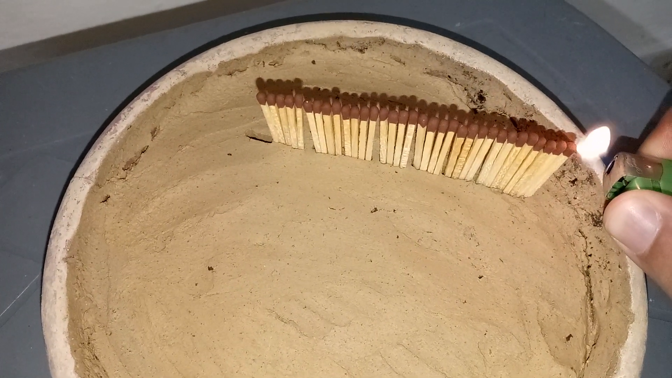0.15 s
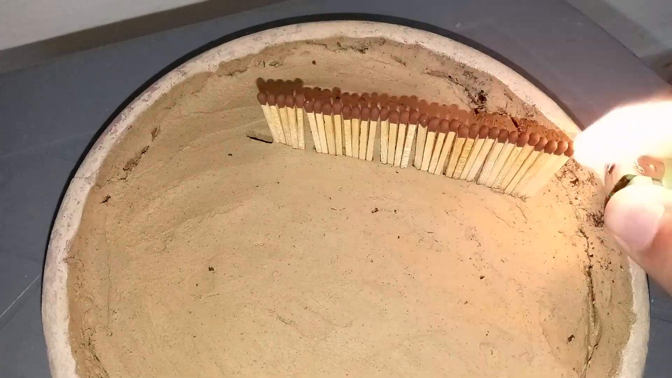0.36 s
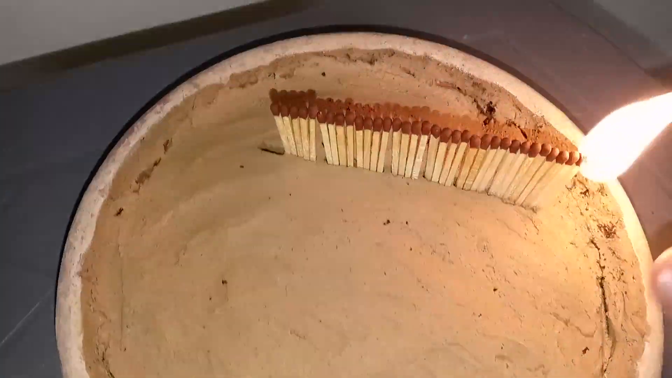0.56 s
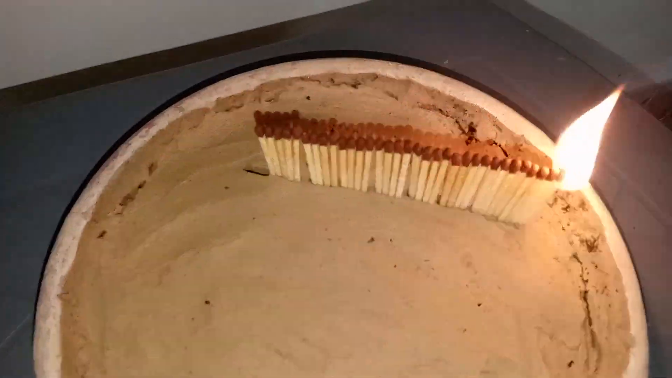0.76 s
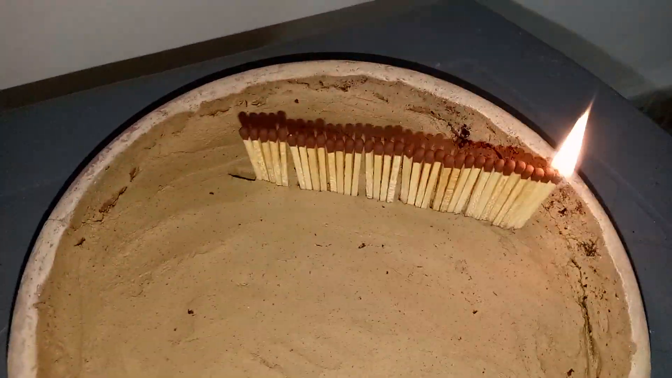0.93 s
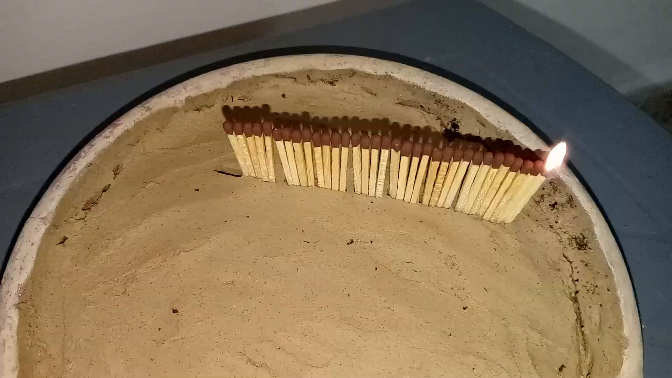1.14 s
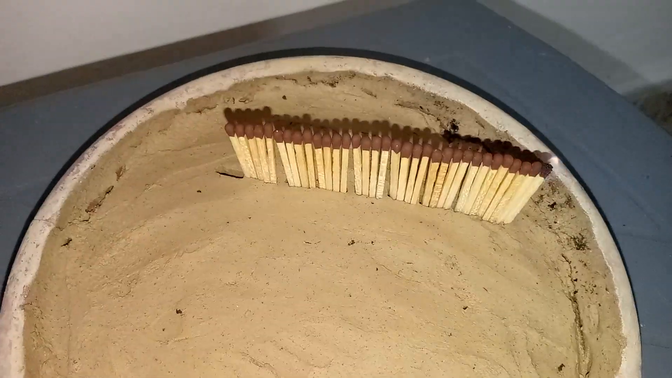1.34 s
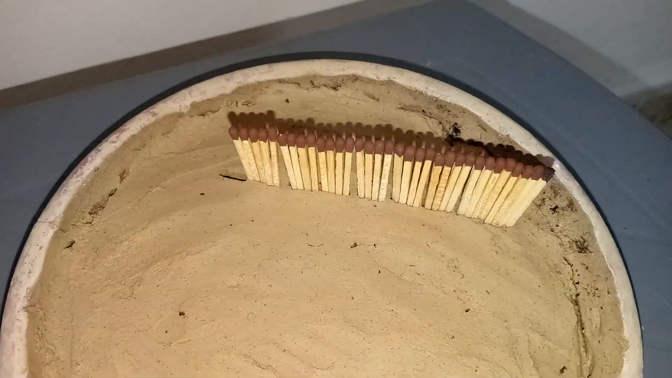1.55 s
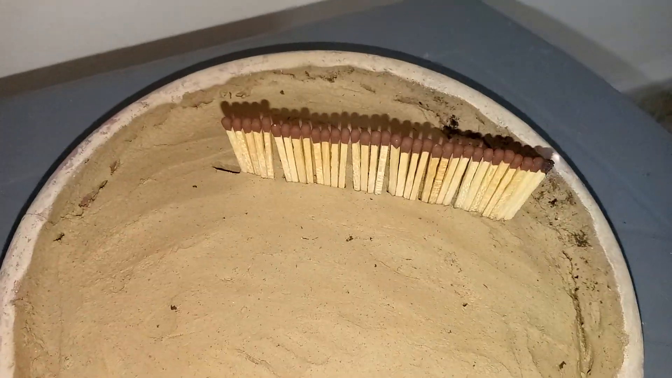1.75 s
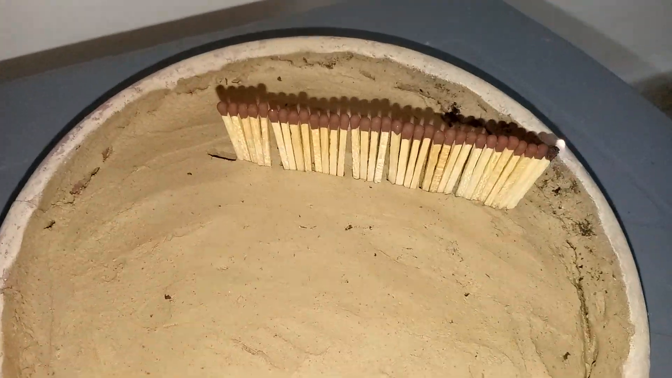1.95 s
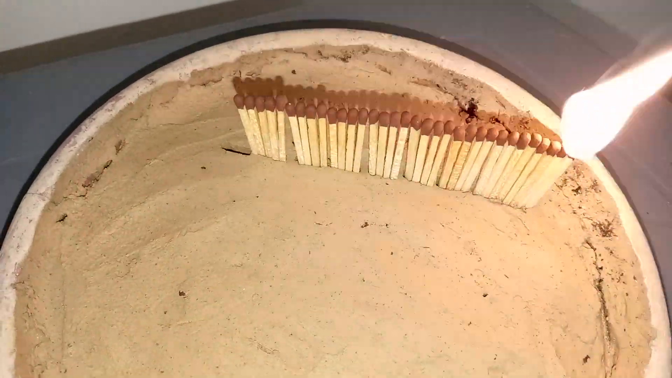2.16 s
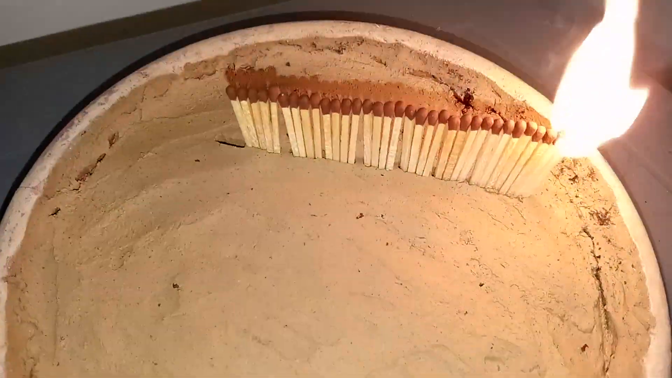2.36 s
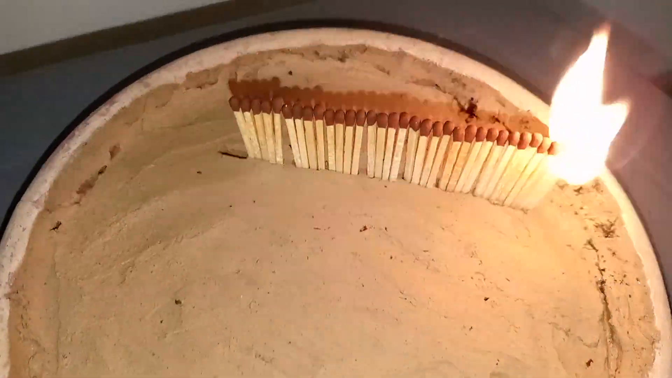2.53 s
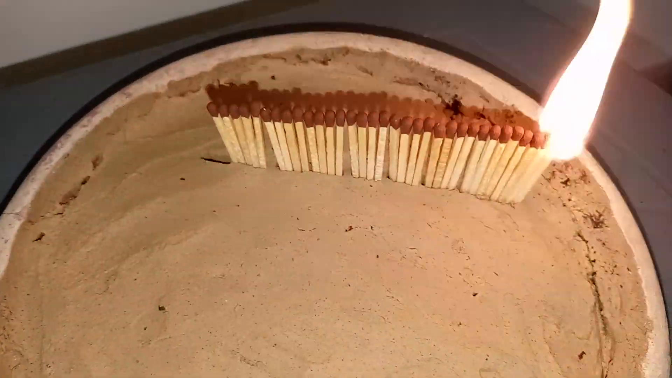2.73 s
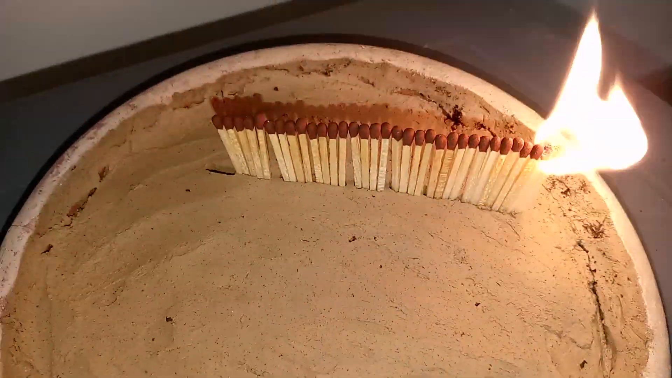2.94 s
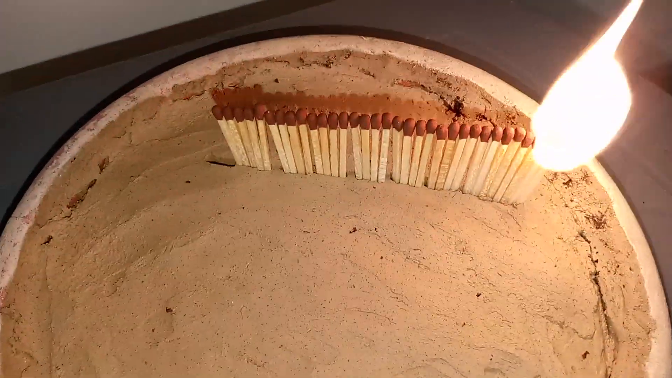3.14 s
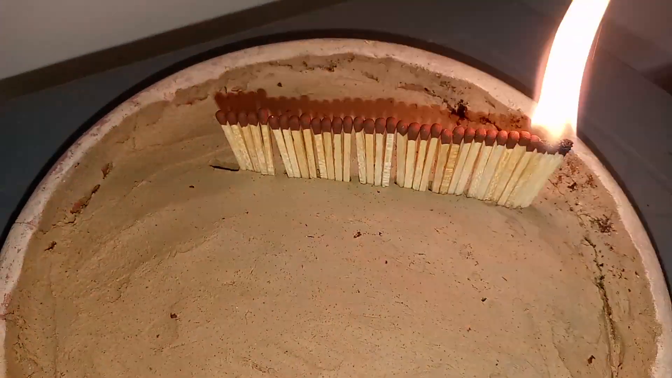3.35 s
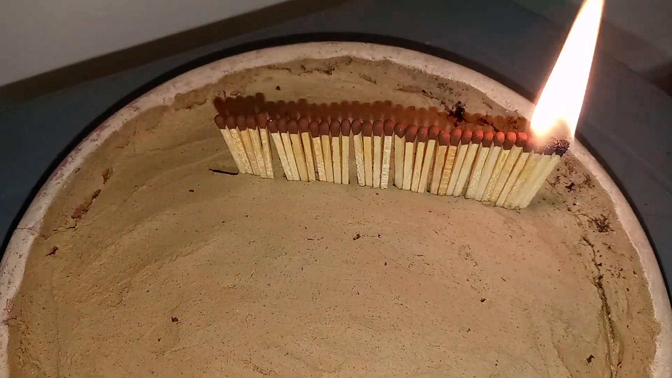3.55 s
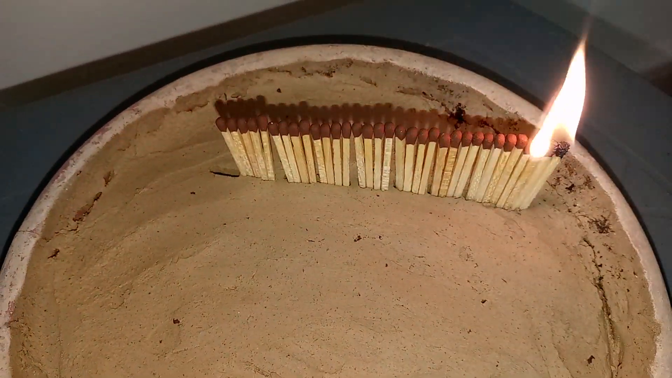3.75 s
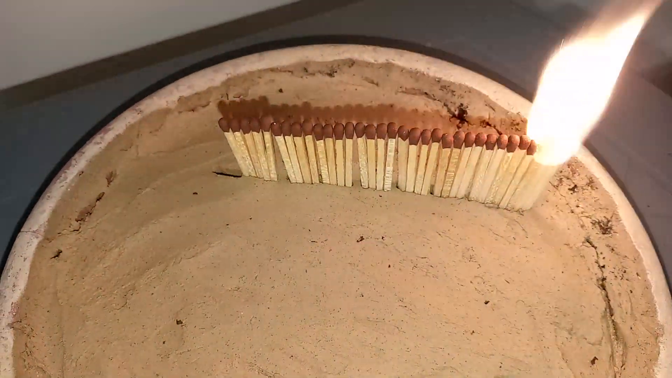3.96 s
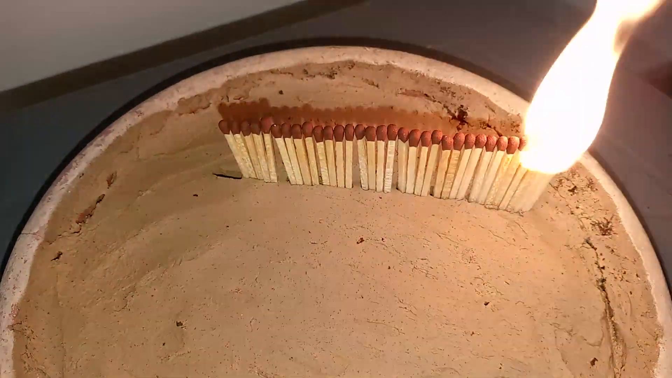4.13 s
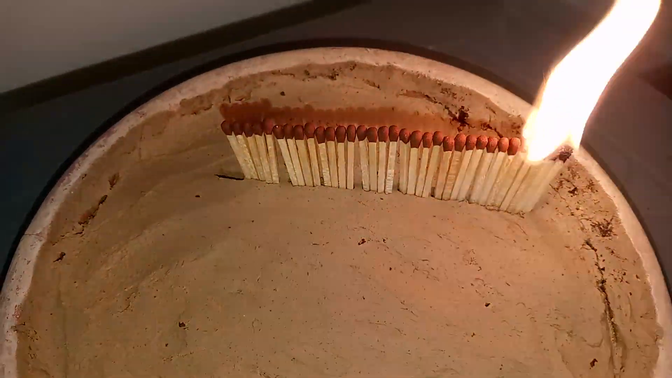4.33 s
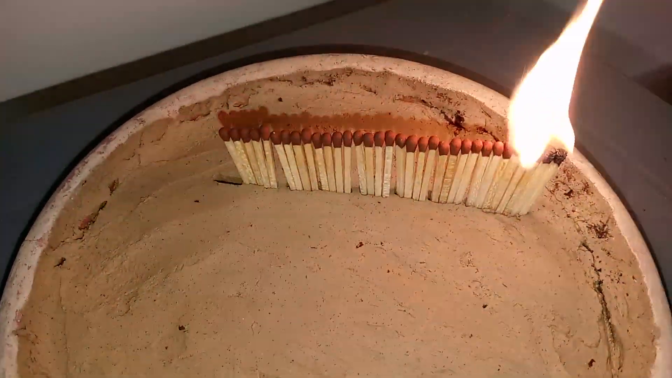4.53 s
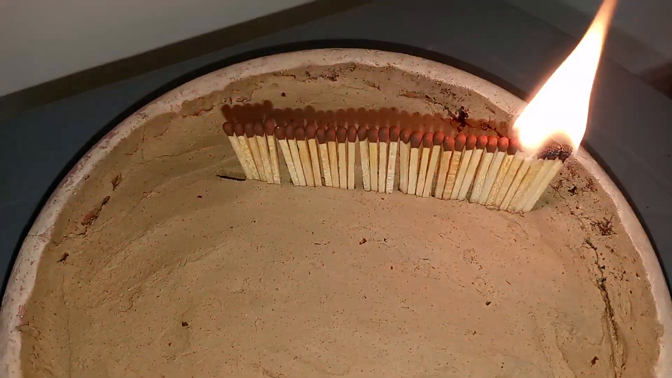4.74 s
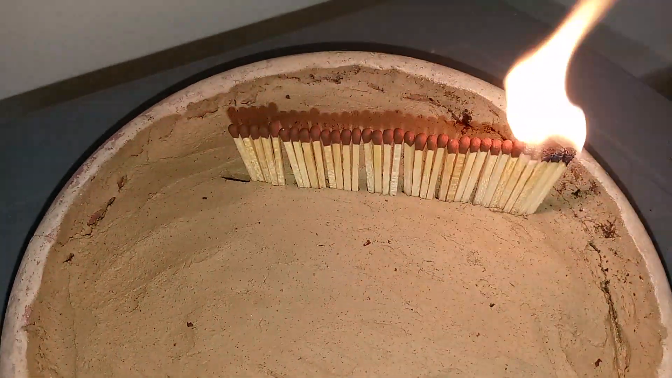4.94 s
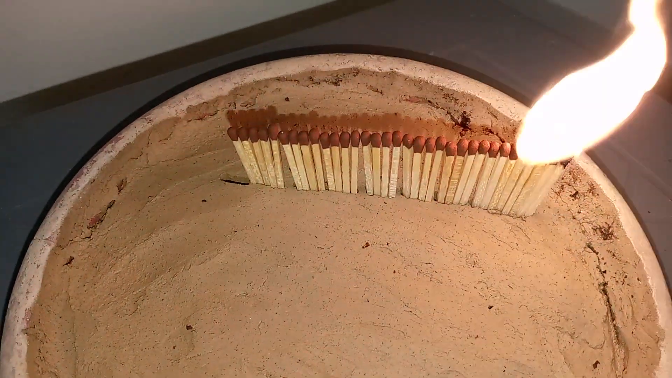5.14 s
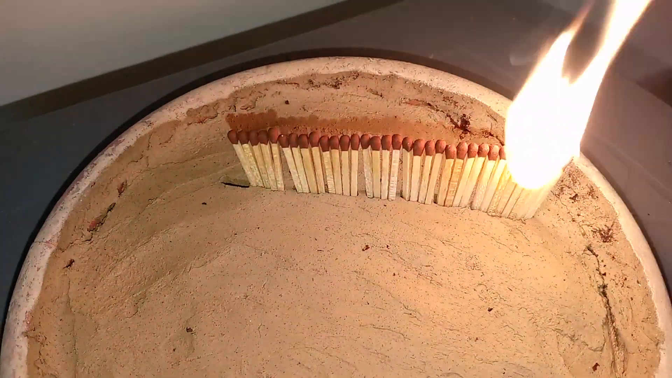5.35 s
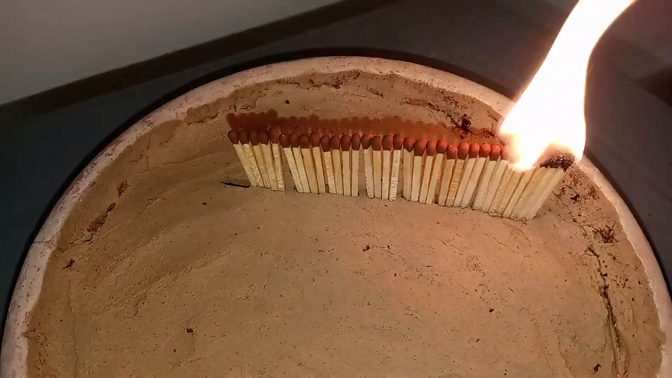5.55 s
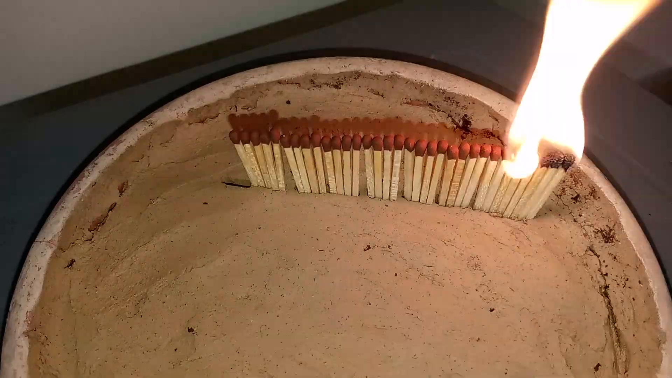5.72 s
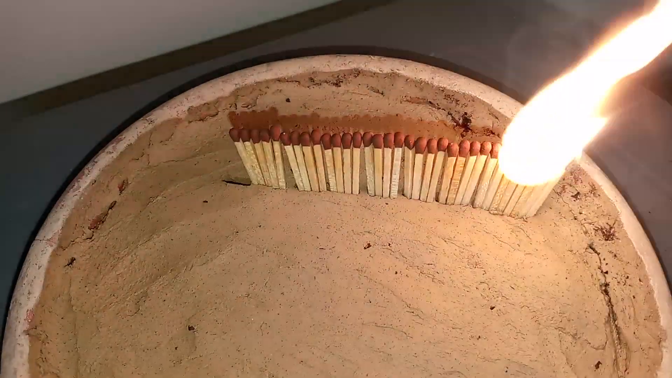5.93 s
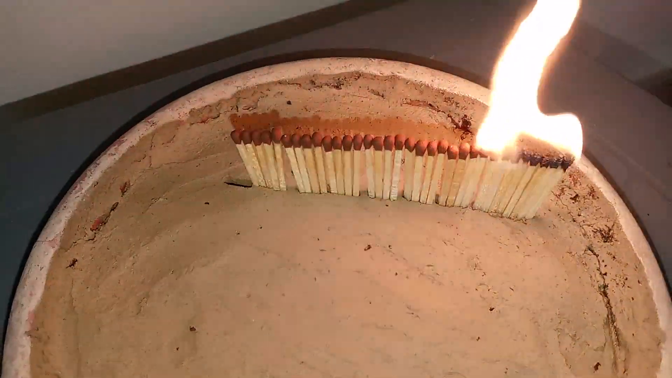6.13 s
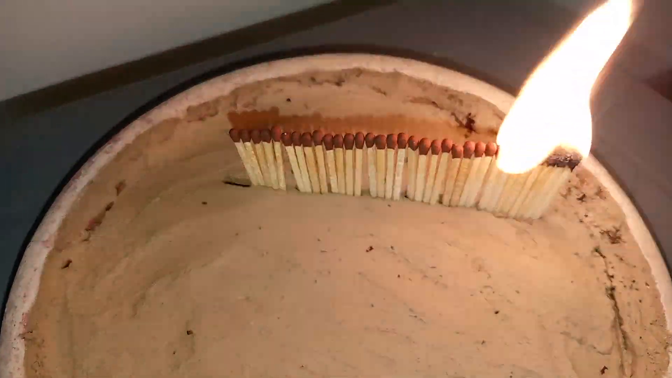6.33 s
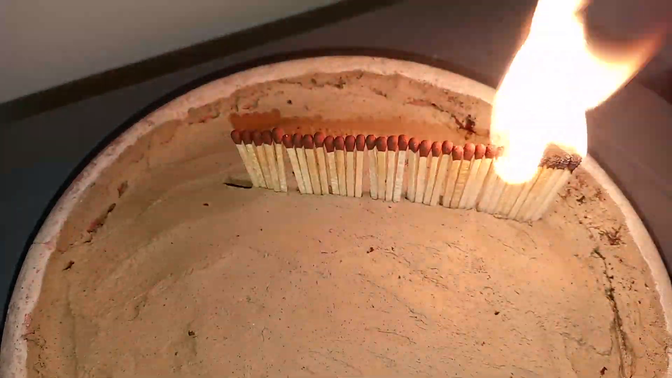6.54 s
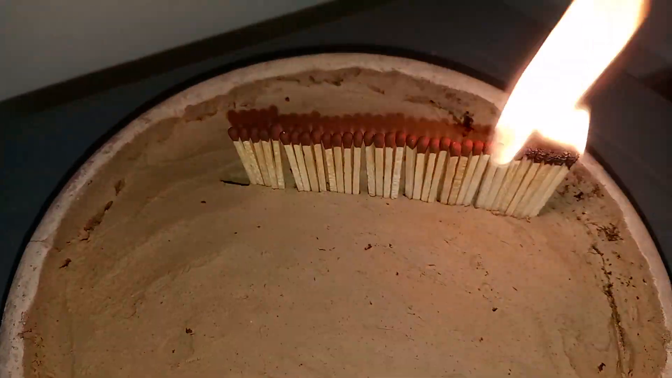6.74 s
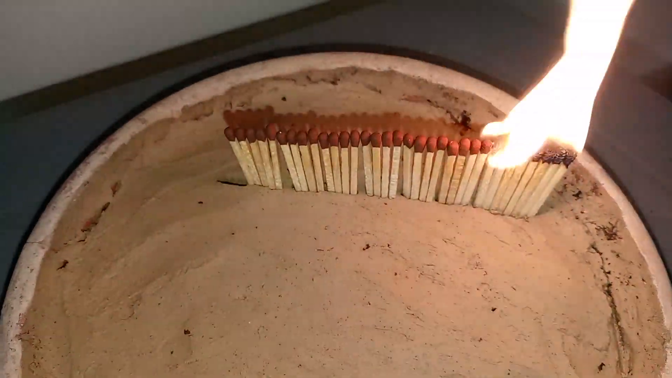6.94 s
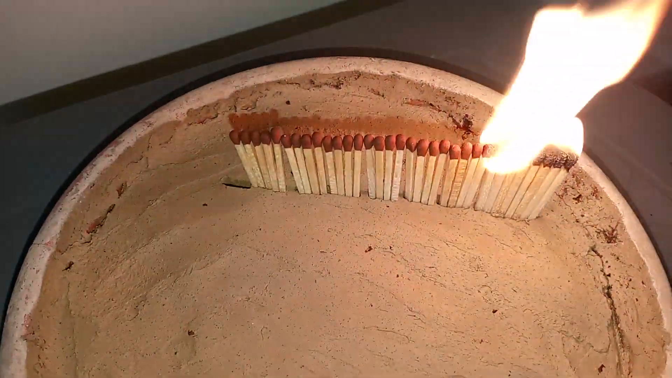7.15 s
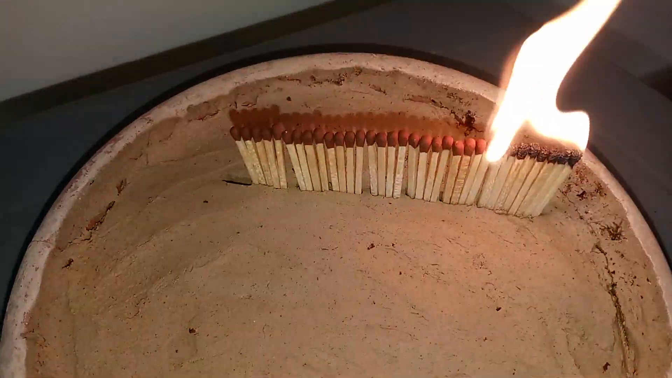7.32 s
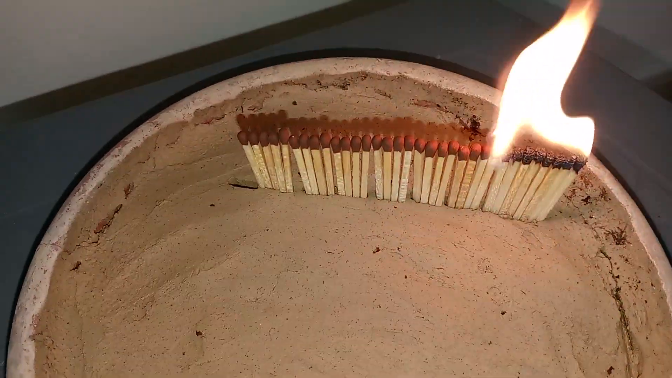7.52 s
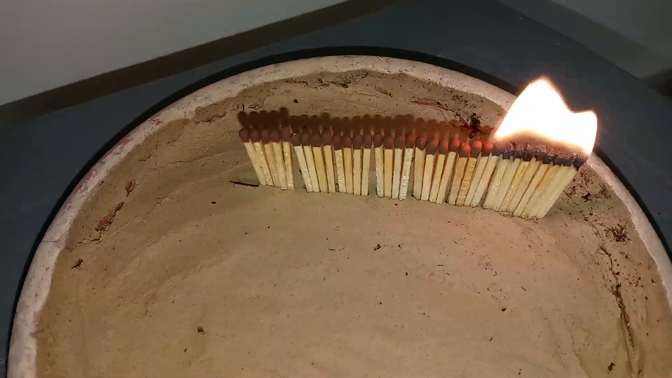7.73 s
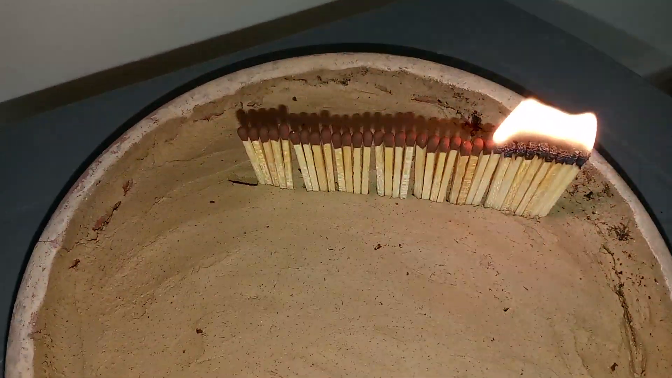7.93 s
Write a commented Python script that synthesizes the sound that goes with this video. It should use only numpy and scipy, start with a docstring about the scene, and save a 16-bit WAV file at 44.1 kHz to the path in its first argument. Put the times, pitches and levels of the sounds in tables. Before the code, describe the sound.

A match head flares with a sizzling rush and bursts with one sharp pop, then dies down to a thin hiss with small crackles. After a short lull, the fire jumps along a row of matches, each head flaring in a brief, fluttering roar and sizzle, with dry snaps between. The sound is close to the microphone in a small, quiet room.

```python
"""A row of matches burns in a bowl of sand, close to one microphone, in a small quiet room.
The first head, set off by a lighter, flares, bursts with a sharp pop and dies to a smoulder.
The fire then jumps from head to head. Each flare is the roar of a turbulent gas jet with a sizzle
of tiny bursts, and crusts snap as it starts and fades. The resonances of the bowl colour the fire.
Two faint whistles, a steady hiss and a low rumble lie beneath it."""
import sys
import numpy as np
from scipy import signal
from scipy.fft import rfft, irfft
from scipy.io import wavfile

SR = 44100
rng = np.random.default_rng(int(sys.argv[2]) if len(sys.argv) > 2 else 0)


def log_audio(samples):
    """Write samples as a 16-bit WAV file to the path given in sys.argv[1]."""
    # one column per channel
    frames = np.atleast_2d(samples).T
    # limit to full scale, then quantise
    limited = np.clip(frames, -1, 1)
    pcm = np.round(limited * 32767).astype(np.int16)
    wavfile.write(sys.argv[1], SR, pcm)


N = 351918
TIME = np.arange(N) / SR


def from_db(db):
    """Amplitude ratio of a level: tenfold per 20 dB."""
    return 10 ** (np.asarray(db) / 20)


def rms(x):
    """Effective amplitude: the root mean square."""
    return np.sqrt(np.mean(x ** 2) + 1e-20)


def envelopes(rows):
    """Piecewise exponential envelopes, one per level column, silent outside the listed times."""
    t, *columns = np.transpose(rows)
    return [from_db(np.interp(TIME, t, db)) * (TIME >= t[0]) * (TIME <= t[-1]) for db in columns]


def convolve(x, response):
    """Linear system: the output is the input convolved with the impulse response."""
    return signal.fftconvolve(x, response)[:N]


def band(x, hz, kind):
    """Maximally flat filter of order four."""
    return signal.sosfilt(signal.butter(4, hz, kind, fs=SR, output="sos"), x)


def flutter(hz):
    """Random modulation: low-passed noise of unit RMS."""
    slow = signal.sosfilt(signal.butter(2, hz, fs=SR, output="sos"), rng.standard_normal(N))
    return slow / rms(slow)


def dying_noise(t60, hold_s=0):
    """Exponential decay: noise of unit energy that holds, then falls 60 dB in t60 seconds."""
    t = TIME[:SR // 4]
    burst = rng.standard_normal(len(t)) * from_db(-60 * np.maximum(t - hold_s, 0) / t60)
    return burst / np.linalg.norm(burst)


# Peaks and hollows of bowl, table and microphone: f/Hz, width/Hz, gain/dB at depth 1
BOWL_RESONANCES = [(117, 47, 7), (240.7, 71, 7), (313, 32, 9), (379, 6.7, 10.5), (547, 13, 8.5),
                   (657.5, 308, 8.5), (1007, 130, 6), (1652, 704, 9.5), (1992, 67, -5), (2513, 160, -14.5),
                   (2660, 44, -2.5), (3100, 99, -5), (3570, 506, 6.5), (4830, 700, -5), (5690, 58, 7.5),
                   (6640, 150, 6.5), (6946, 76, 9), (8060, 270, -8), (8610, 500, 0), (10030, 1720, 13.5),
                   (11550, 420, 7)]
def bowl(spectrum, peaks=(), depth=1, size=4096):
    """Source-filter model: unit-energy impulse response of a source spectrum heard in the bowl."""
    hz = np.maximum(np.fft.rfftfreq(size, 1 / SR), 1)
    corners, levels = np.transpose(spectrum)
    db = np.interp(np.log(hz), np.log(corners), levels)
    for centre, width, height in [*BOWL_RESONANCES, *peaks]:
        db += depth * height * .5 ** ((2 * (hz - centre) / width) ** 2)  # spread-out sources: less depth
    cepstrum = irfft(np.log(from_db(db)))
    cepstrum[1:size // 2] *= 2  # minimum phase: resonances ring after the blow, never before
    cepstrum[size // 2 + 1:] = 0
    response = irfft(np.exp(rfft(cepstrum)))
    return response / np.linalg.norm(response)


# Spectra of the room's hiss and rumble: f/Hz, relative level/dB
HISS_SPECTRUM = [(25, -35.5), (60, -2), (120, 2), (250, -5), (700, -7.5), (1700, -13.5), (3200, -17),
                 (4600, -31), (6100, -18.5), (8200, -32.5), (10000, -26), (12000, -29.5), (13700, -33.5),
                 (15500, -34)]
RUMBLE_SPECTRUM = [(25, -29.5), (40, -10), (52, -1.5), (100, -10.5), (250, -11.5), (500, -23),
                   (2000, -57.5), (8000, -84)]
# Envelope of the rumble: t/s, level/dB
RUMBLE_LEVELS = [(0, -85), (1.3, -85.5), (2.0, -71), (3.6, -76), (5.0, -73.5), (6.9, -70.5), (7.42, -65.5),
                 (7.98, -73.5)]
def room_air(hiss_db=-67.5):
    """Noise floor: a steady hiss, and a low rumble that swells towards the end."""
    hiss = convolve(rng.standard_normal(N), bowl(HISS_SPECTRUM, depth=0.21))
    rumble = convolve(rng.standard_normal(N), bowl(RUMBLE_SPECTRUM))
    return from_db(hiss_db) * hiss + envelopes(RUMBLE_LEVELS)[0] * rumble


def swell(middle_s, length_s):
    """Flat-topped time window with smooth flanks."""
    away = np.minimum(np.square(2 * (TIME - middle_s) / length_s), 10)
    return np.exp(-away * away)


# Thin whistles: middle t/s, duration/s, f/Hz, level/dB
WHISTLE_TONES = [(0.033, 0.2, 1515, -70), (2.89, 0.15, 1310, -70)]
def whistles(waver_hz=52.3):
    """Random frequency modulation: faint tones waver, each just before a head catches."""
    out, waver = np.zeros(N), waver_hz * flutter(65)
    for t, length_s, hz, db in WHISTLE_TONES:
        phase = 2 * np.pi * np.cumsum(hz + waver) / SR
        out += from_db(db) * swell(t, length_s) * np.sin(phase)
    return out


def flare(strengths, response, bursts_per_s, spread_db, grain, flicker_db, split_hz, roar_db, sizzle_db):
    """Jet noise and shot noise: turbulent gas roars, and gas pockets sizzle through the melt."""
    roar, sizzle = strengths
    vigour = np.clip(roar / np.percentile(roar, 95), .25, 1)
    chance = bursts_per_s * vigour / SR  # harder burning, denser bursts
    sizes = from_db(spread_db * np.minimum(rng.exponential(1, N), 4)) * rng.choice([-1, 1], N)
    bursts = (rng.random(N) < chance) * sizes / rms(sizes) / np.sqrt(chance)
    jet, flicker = rng.standard_normal(N), flicker_db * flutter(110)
    # grain is the bursts' share of the power, halved in the roar
    low = (np.sqrt(1 - grain / 2) * jet + np.sqrt(grain / 2) * bursts) * from_db(0.45 * flicker)
    high = (np.sqrt(1 - grain) * jet + np.sqrt(grain) * bursts) * from_db(flicker)
    low, high = convolve(low, response), convolve(high, response)
    low = band(low, split_hz, "low") / rms(band(low, [150, 2200], "band"))
    high = band(high, split_hz, "high") / rms(band(high, 5000, "high"))
    return from_db(roar_db) * roar * low + from_db(sizzle_db) * sizzle * high


# The first head catches and burns down: t/s, relative roar level/dB, relative sizzle level/dB
FIRST_LEVELS = [(0.271, -59.5, -62), (0.297, -52.5, -50.5), (0.39, -48.5, -49.5), (0.485, -53.5, -47.5),
                (0.52, -49.5, -44.5), (0.66, -49.5, -49), (0.755, -55, -56), (0.805, -50, -45.5),
                (0.84, -62, -60), (1.25, -78, -88)]
# Its spectrum: f/Hz, relative level/dB
FIRST_SPECTRUM = [(30, -20), (80, -10), (250, 1.5), (700, 1), (1500, -2.5), (3100, 0), (4400, -7),
                  (7000, -2.5), (9300, -3), (11300, -13.5), (12400, -12.5), (13700, -23), (15500, -20)]
# Peaks and hollows next to the rim: f/Hz, width/Hz, gain/dB
RIM_RESONANCES = [(1920, 430, -9.5), (2500, 300, 1), (3200, 350, 5.5), (5670, 360, -2), (6300, 180, 10.5),
                  (7950, 660, 1), (9940, 650, -10.5)]
def first_head():
    """Combustion noise of the first head, filtered by the nearby rim."""
    return flare(envelopes(FIRST_LEVELS), bowl(FIRST_SPECTRUM, RIM_RESONANCES), bursts_per_s=6800,
                 spread_db=5.5, grain=0.81, flicker_db=2, split_hz=2700, roar_db=-0.6, sizzle_db=-0.4)


# Reflections off sand, rim and table: delay/s, level/dB
REFLECTIONS = [(0.0014, -16), (0.0036, -24), (0.0045, -17.5)]
def cracks(rows, response, spit_t60, spit_db, gain_db, tone_spread=0):
    """Impulse excitation: each crack is a sharp pulse, its early reflections and a spit of gas."""
    out = np.zeros(N + SR)
    dullness = tone_spread * rng.uniform(-0.88, 1, len(rows))
    for (t, peak_db, spit_s), dull in zip(rows, dullness):
        blow = from_db(spit_db) * dying_noise(spit_t60, spit_s)
        blow[0] += 1
        for delay, echo_db in REFLECTIONS:
            blow[int(delay * SR)] += from_db(echo_db)
        blow = signal.lfilter([1], [1, -dull], blow)  # thicker crusts break more dully
        sound = signal.fftconvolve(blow, response)
        at = int(t * SR)
        out[at:at + len(sound)] += from_db(peak_db + gain_db) * sound / np.abs(sound).max()
    return out[:N]


# The first head bursts: t/s, relative peak level/dB, spit duration/s
HEAD_BURST = [(0.4932, -7.5, .0003)]
# Its spectrum: f/Hz, relative level/dB
POP_SPECTRUM = [(100, -10), (1000, -19.5), (1800, -17), (3000, -0.5), (4300, -13), (6200, -1), (7500, -2),
                (9200, -0.5), (10000, -3), (11200, 1), (12000, -1), (13500, -16.5), (15500, -7.5)]
def pop():
    """Pressure transient: the bursting head sends out one brief, broadband pulse."""
    return cracks(HEAD_BURST, bowl(POP_SPECTRUM), spit_t60=0.013, spit_db=5.5, gain_db=-0.5)


# Envelope of the smouldering first stick: t/s, level/dB
SMOULDER_LEVELS = [(0.7, -70), (0.95, -59.5), (1.18, -60.5), (1.29, -66), (1.4, -77.5), (1.53, -81),
                   (1.62, -71), (1.9, -72), (2.1, -76.5)]
# Its spectrum: f/Hz, relative level/dB
SMOULDER_SPECTRUM = [(100, -13), (1000, -21), (2000, -10), (2900, -0.5), (3700, -4), (4600, -12),
                     (5500, -5), (6150, 4), (6800, -2.5), (8200, -7), (10000, -2.5), (12000, -13),
                     (13700, -26), (15500, -25)]
def smoulder():
    """Filtered noise: hot wood gives off a smooth, thin hiss."""
    hiss = convolve(rng.standard_normal(N), bowl(SMOULDER_SPECTRUM, depth=0.15))
    return envelopes(SMOULDER_LEVELS)[0] * hiss


# The loudest snaps: t/s, relative peak level/dB, spit duration/s
LOUD_SNAPS = [(0.835, -34, 0.003), (0.851, -34, 0.003), (0.863, -36, 0.003), (0.893, -34.5, 0.0033),
              (0.943, -33, 0.0021), (0.972, -34, 0.0034), (1.074, -40, 0.0021), (1.202, -38, 0.0032),
              (1.274, -40.5, 0.0022), (1.533, -47, 0.0027), (1.576, -51.5, 0.0027), (2.113, -34.5, 0.0036),
              (2.205, -26.5, 0.0025), (2.555, -24.5, 0.0032), (2.702, -34.5, 0.0032), (2.842, -38, 0.0027),
              (2.94, -27, 0.003), (3.328, -35, 0.0035), (3.381, -42, 0.0028), (3.541, -36.5, 0.003),
              (3.682, -43, 0.0019), (3.851, -39, 0.0026), (4.232, -23, 0.0025), (4.268, -26.5, 0.0037),
              (4.43, -28.5, 0.0034), (4.509, -32, 0.0024), (4.537, -41, 0.0033), (4.566, -25, 0.0025),
              (4.676, -46, 0.0033), (4.72, -32, 0.0026), (4.812, -33, 0.0019), (4.874, -45, 0.004),
              (5.056, -38, 0.0025), (5.074, -38, 0.0036), (5.159, -31.5, 0.0027), (5.638, -31, 0.0041),
              (5.66, -35.5, 0.003), (5.683, -34, 0.0039), (5.717, -32.5, 0.0033), (5.809, -38, 0.0022),
              (5.833, -30.5, 0.003), (6.818, -42, 0.003), (7.004, -35, 0.0036), (7.012, -36, 0.003),
              (7.041, -28.5, 0.0032), (7.094, -27, 0.0023), (7.276, -25.5, 0.0028), (7.342, -38, 0.003),
              (7.355, -30.5, 0.0026), (7.377, -39, 0.0026), (7.413, -34.5, 0.0032), (7.462, -36, 0.0053),
              (7.482, -35.5, 0.003), (7.506, -42, 0.003), (7.69, -44, 0.0057)]
# Spectrum of a snap: f/Hz, relative level/dB
SNAP_SPECTRUM = [(60, -30), (300, -6), (1500, -5.5), (3200, -2.5), (6000, -2.5), (10000, -5), (12000, -11),
                 (13700, -18.5), (15500, -10)]
def crust_snaps(heads, per_head=5, above_sizzle_db=7.5, spread_db=7, spit_s=.002):
    """Brittle fracture: crusts snap at the listed times, and at random in each head's second half."""
    rows = list(LOUD_SNAPS)
    for start_s, length_s, _, _, _, sizzle_db, *_ in heads:
        times = start_s + length_s * (1 - .5 * rng.random(per_head))
        peaks = sizzle_db + above_sizzle_db + spread_db * rng.standard_normal(per_head)
        rows += [(t, db, spit_s) for t, db in zip(times, peaks)]
    response = bowl(SNAP_SPECTRUM, depth=0.99)
    return cracks(rows, response, spit_t60=0.011, spit_db=6, gain_db=-2.46, tone_spread=0.44)


def burn(start_s, length_s, fade_db_per_s, catch_s=0.0061):
    """Envelope of a burst of gas: linear attack, hold and exponential decay."""
    age = TIME - start_s
    return np.clip(age / catch_s, 0, 1) * from_db(-np.clip(fade_db_per_s * (age - length_s), 0, 200))


def resonance(x, hz, width_hz):
    """Second-order resonator with unit gain at its centre."""
    return signal.lfilter(*signal.iirpeak(hz, hz / width_hz, fs=SR), x)


def flame_paths(x, heads):
    """Interference: the path from each head to the microphone weakens or lifts two bands."""
    for start_s, length_s, *_, hollow_hz, hollow_db, lift_hz, lift_db in heads:
        hollow = (from_db(hollow_db) - 1) * resonance(x, hollow_hz, width_hz=550)
        lift = (from_db(lift_db) - 1) * resonance(x, lift_hz, width_hz=620)
        x = x + swell(start_s + length_s / 2, 1.34 * length_s) * (hollow + lift)
    return x


# The following heads: t/s, duration/s, crest time/duration, drop at both ends/dB, relative roar level/dB,
# relative sizzle level/dB, stutter/dB, hollow f/Hz, hollow gain/dB, lift f/Hz, lift gain/dB
ROW_HEADS = [(2.115, 0.55, 0.24, 2.5, -48, -46.5, 1.5, 2110, -5, 8900, 4),
             (2.952, 0.37, 0.68, 4.5, -45, -46, 3.5, 3700, -1, 2540, 3.5),
             (3.916, 0.33, 0.16, 3.5, -46.5, -46, 1, 8240, -6.5, 10240, 4),
             (4.256, 0.42, 0, 5.5, -50.5, -51, 5.5, 8600, -10, 10400, -2),
             (5.104, 0.52, 0.48, 12, -44.5, -46, 3, 4870, -6.5, 6050, 2),
             (5.836, 0.44, 0.34, 8.5, -46, -46, 2.5, 4640, -7.5, 980, -0.5),
             (6.256, .435, 0.34, 10, -44.5, -44, 3, 4600, -6.5, 6500, 2.5),
             (7.011, 0.32, 0.57, 9.5, -49.5, -50, 4.5, 4450, -12.5, 6600, 2)]
# Short spurts of gas: t/s, duration/s, relative roar level/dB, relative sizzle level/dB
GAS_SPURTS = [(3.363, .035, -55.5, -66), (3.858, 0.018, -55.5, -59.5), (4.299, 0.029, -48.5, -43.5),
              (5.724, .01, -55, -58), (6.711, 0.051, -56.5, -48.5), (7.502, .012, -62, -49.5)]
def burning_row(glow_db=-21.5, glow_fade_db_per_s=25.5, sticks_db=-74.5, surge_db=0.5):
    """Incoherent sources add in power: flaring heads, their glow, gas spurts and hissing sticks."""
    power = np.zeros((2, N))  # roar, sizzle
    stutter = np.minimum(flutter(87), 1)
    for start_s, length_s, crest, ends_db, roar_db, sizzle_db, stutter_db, *_ in ROW_HEADS:
        done = np.clip((TIME - start_s) / length_s, 0, 1)
        crest = np.clip(crest, .05, .95)
        weak = np.where(done < crest, 1 - done / crest, (done - crest) / (1 - crest)) ** 2
        # a head stutters most as it catches and fades
        arch = from_db(-ends_db * weak + stutter_db * (.3 + weak) * stutter)
        flame = arch * burn(start_s, length_s, fade_db_per_s=362)
        glow = done * from_db(glow_db - glow_fade_db_per_s * np.abs(TIME - start_s - crest * length_s))
        power += from_db([[roar_db], [sizzle_db]]) ** 2 * (flame ** 2 + glow ** 2)
    for start_s, length_s, roar_db, sizzle_db in GAS_SPURTS:
        power += (from_db([[roar_db], [sizzle_db]]) * burn(start_s, length_s, fade_db_per_s=1300)) ** 2
    power[1] += from_db(sticks_db) ** 2 * (TIME > ROW_HEADS[0][0])
    strengths = np.sqrt(power) * from_db(surge_db * flutter(22))  # the heads burn unevenly
    return flame_paths(row_flares(strengths), ROW_HEADS)


# Spectrum of the following heads: f/Hz, relative level/dB
ROW_SPECTRUM = [(25, -26), (45, -32.5), (80, -6.5), (250, -2.5), (800, -2.5), (2000, -6), (6000, -3),
                (10000, -8), (12000, -16), (13700, -23), (14700, -19), (16000, -21)]
def row_flares(strengths):
    """Combustion noise of the row, modulated in amplitude by its roar and sizzle envelopes."""
    return flare(strengths, bowl(ROW_SPECTRUM), bursts_per_s=3500, spread_db=2.5, grain=0.7,
                 flicker_db=1.5, split_hz=2440, roar_db=-2, sizzle_db=-0.3)


def scene(reverb_db=-9.5):
    """Superposition of the fire, its short reverberation and the room air, alike in both channels."""
    fire = first_head() + burning_row() + pop() + crust_snaps(ROW_HEADS) + smoulder() + whistles()
    reverb = from_db(reverb_db) * convolve(fire, dying_noise(t60=.1))
    mono = fire + reverb + room_air()
    return np.array([mono, mono])


def record(dry, cutoff_hz=15900):
    """Band limiting: an elliptic low-pass cuts the top steeply."""
    return signal.sosfilt(signal.ellip(10, .1, 80, cutoff_hz, fs=SR, output="sos"), dry)


dry = scene()
out = record(dry)
log_audio(out)
```